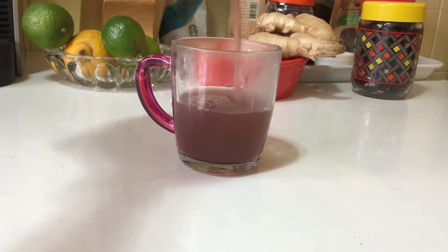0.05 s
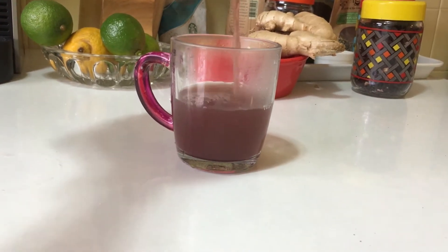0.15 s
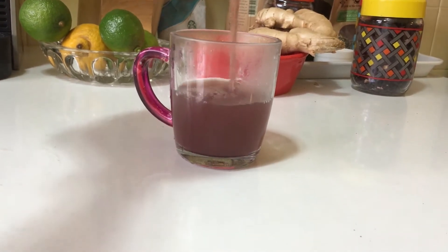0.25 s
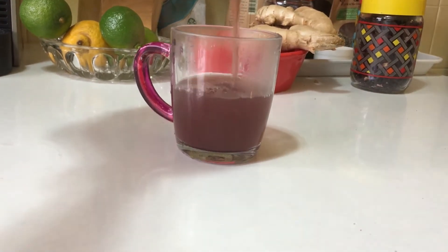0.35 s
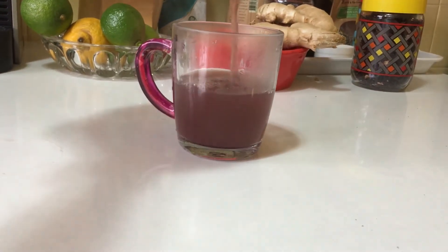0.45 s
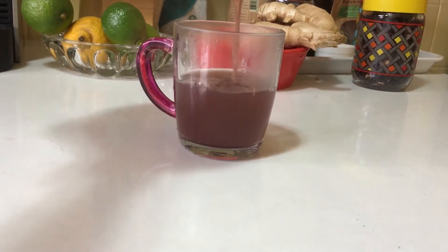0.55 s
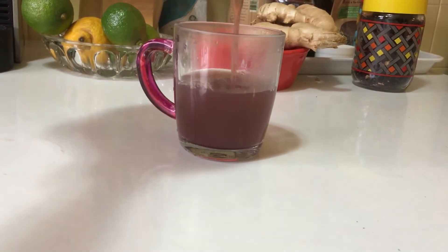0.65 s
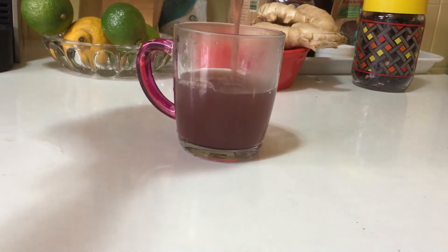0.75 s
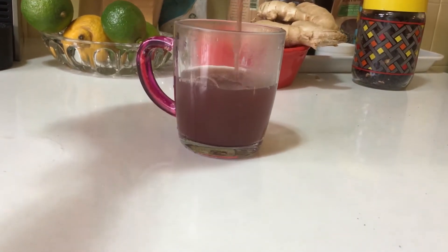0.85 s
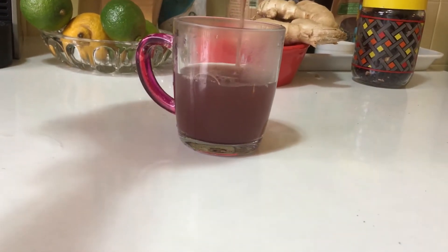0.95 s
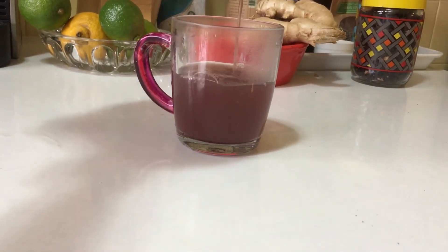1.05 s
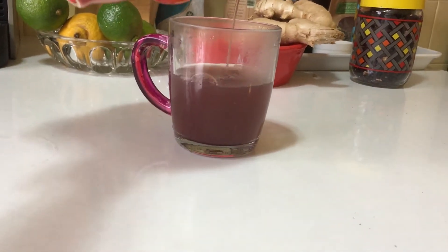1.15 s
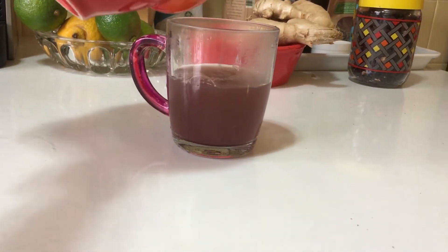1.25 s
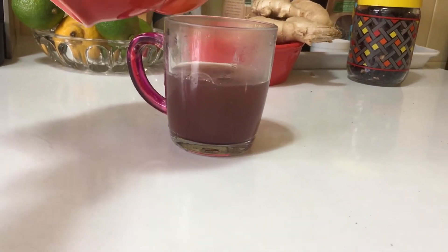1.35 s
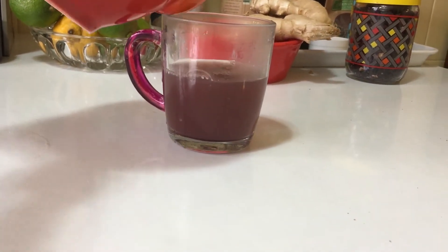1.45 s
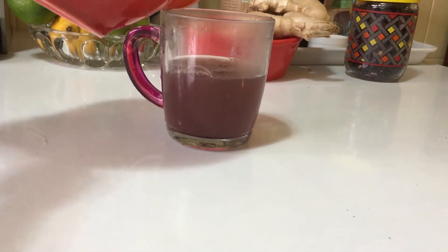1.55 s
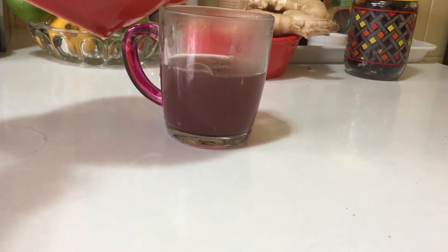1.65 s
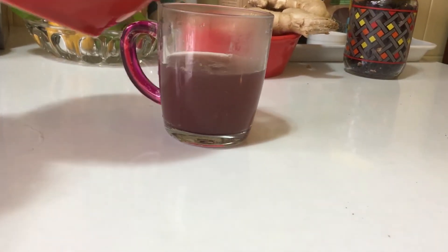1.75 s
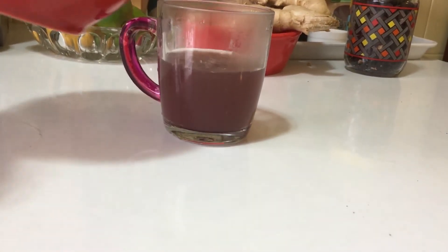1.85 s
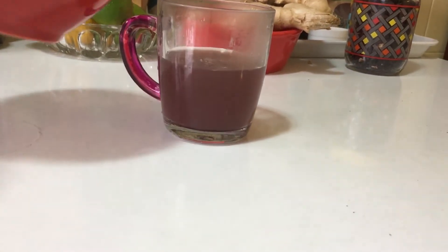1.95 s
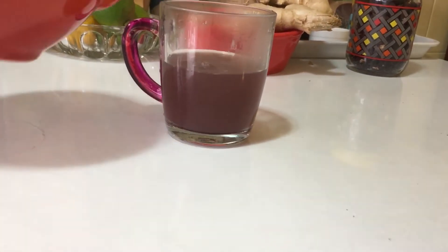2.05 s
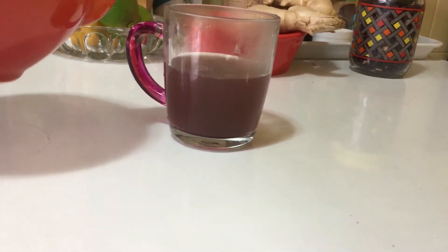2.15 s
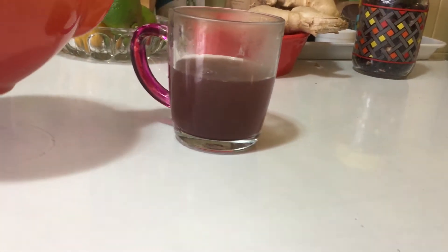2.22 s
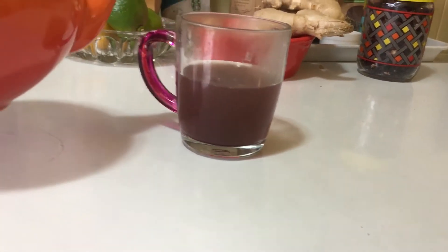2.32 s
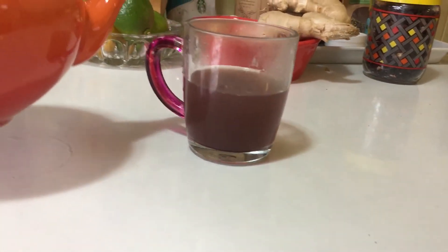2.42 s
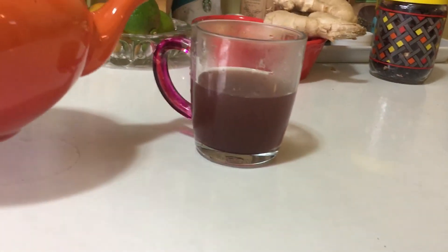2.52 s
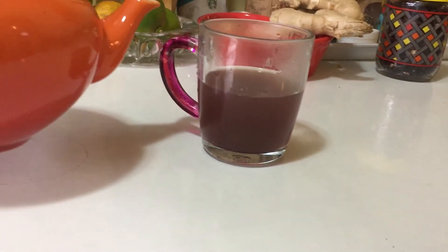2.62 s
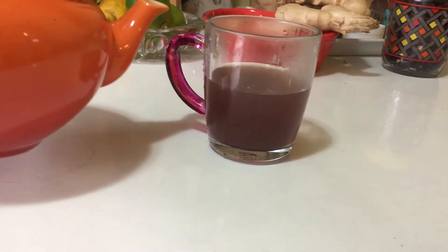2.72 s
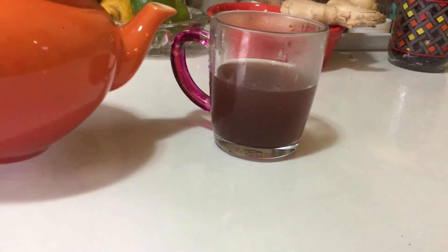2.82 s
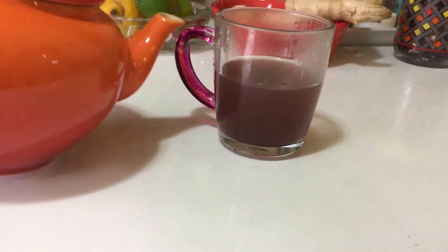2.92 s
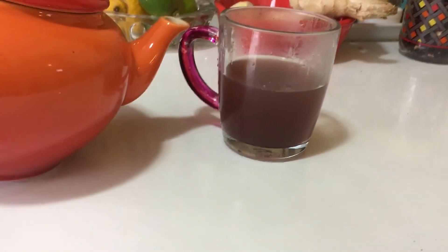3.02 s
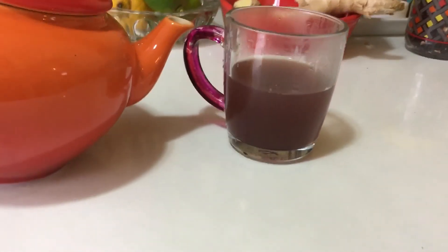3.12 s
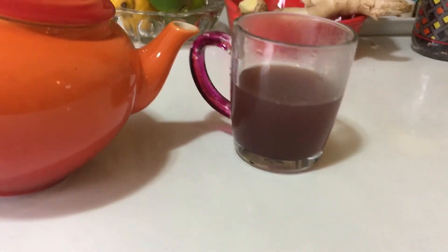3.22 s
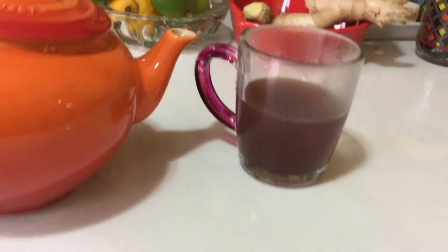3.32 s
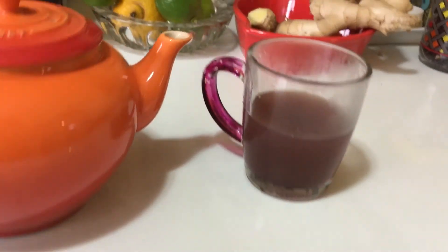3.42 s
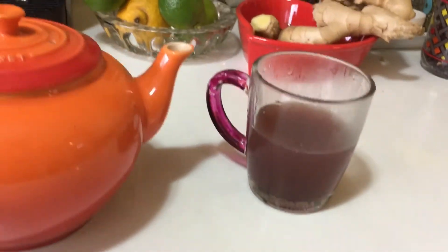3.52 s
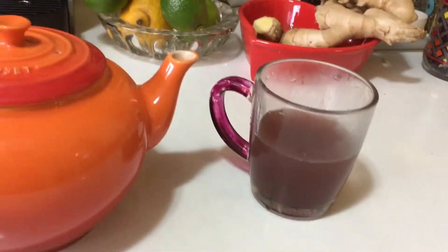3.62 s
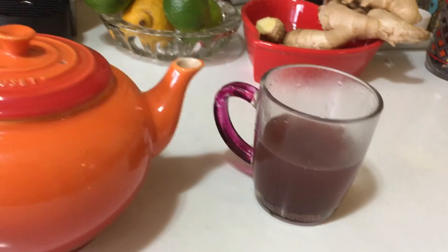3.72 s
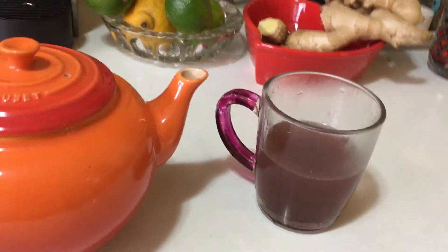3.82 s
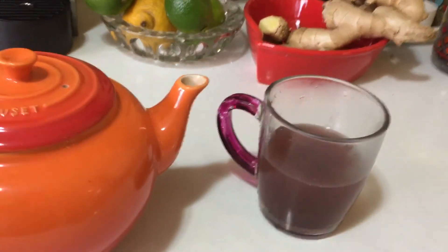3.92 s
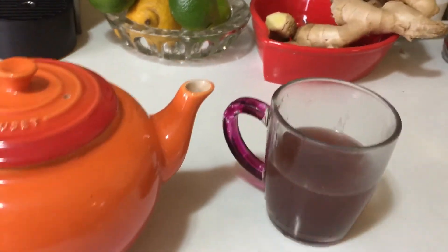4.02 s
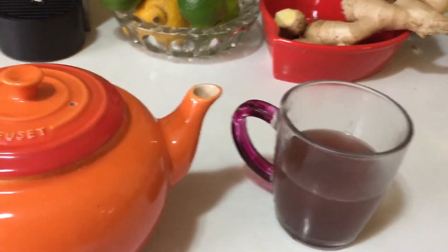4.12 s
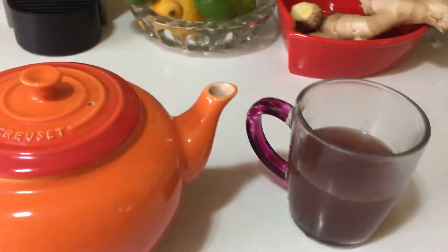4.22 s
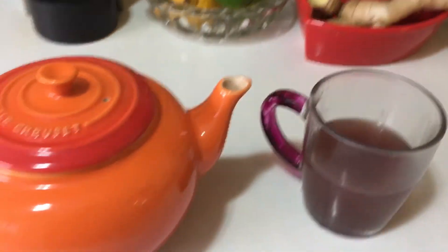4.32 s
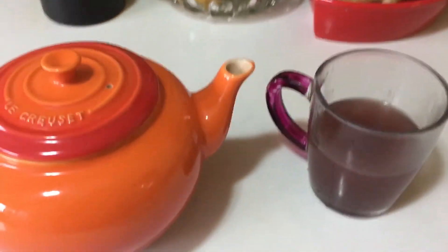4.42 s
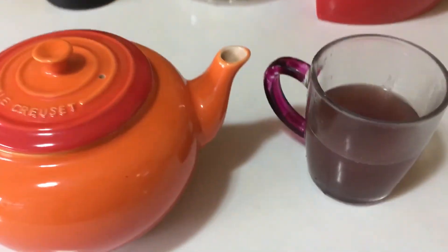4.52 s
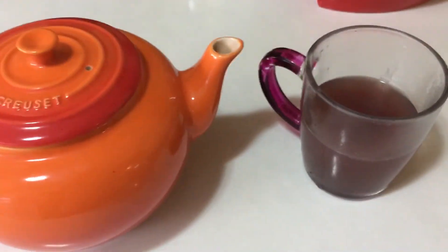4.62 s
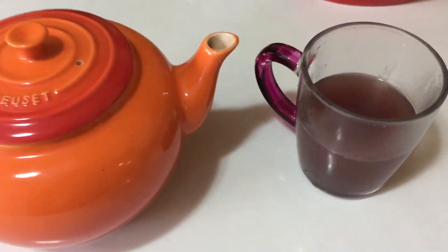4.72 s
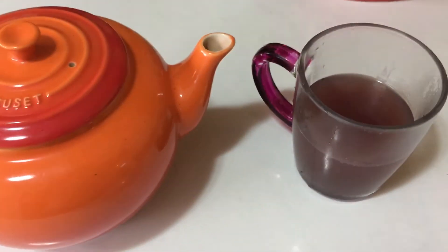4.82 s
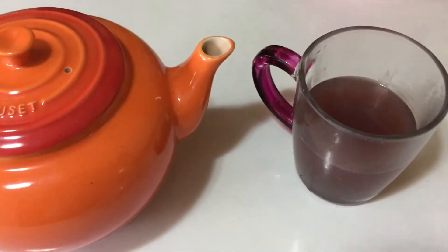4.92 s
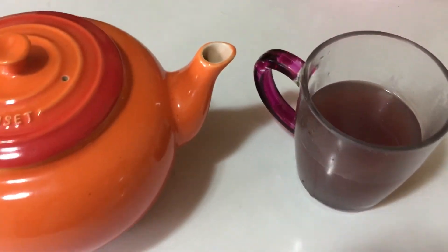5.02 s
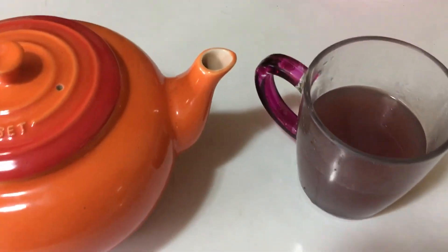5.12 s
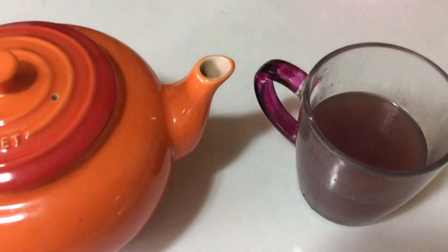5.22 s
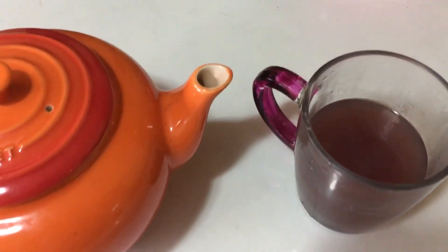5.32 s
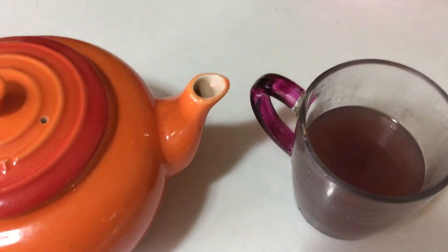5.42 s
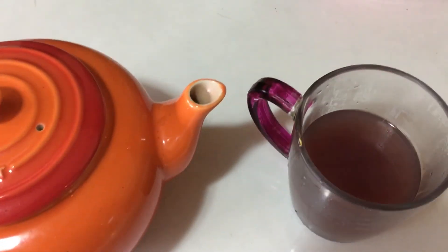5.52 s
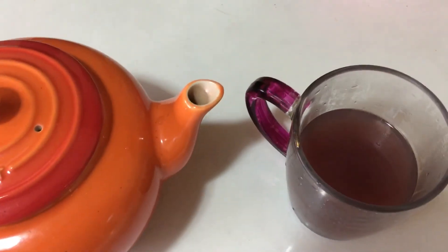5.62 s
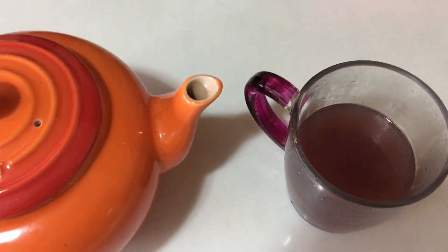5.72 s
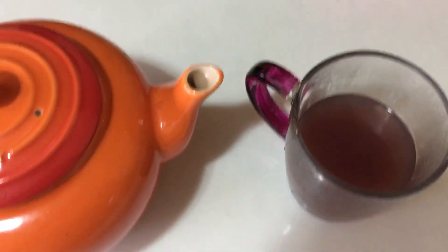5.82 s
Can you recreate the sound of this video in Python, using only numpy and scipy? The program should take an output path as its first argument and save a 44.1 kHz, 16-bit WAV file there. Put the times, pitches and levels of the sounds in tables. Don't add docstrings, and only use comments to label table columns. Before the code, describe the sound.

The last of a tea stream burbles and fizzes into a glass mug, a teapot clinks, then lands in two knocks with a lid rattle.

```python
import sys
import numpy as np
from scipy import signal
from scipy.fft import rfft, irfft
from scipy.io import wavfile
from scipy.ndimage import uniform_filter1d

SR = 44100
rng = np.random.default_rng(int(sys.argv[2]) if len(sys.argv) > 2 else 0)


def invert_db(x):
    u = np.asarray(x, float) / 20
    return 10 ** u


def wav_out(sig):
    wavfile.write(sys.argv[1], SR, np.round(np.clip(np.atleast_2d(sig).T, -1, 1) * 32767).astype(np.int16))


N = 258426
TIME = np.arange(N) / SR


def rms_one(x):
    return x / np.sqrt(np.mean(x ** 2) + 1e-20)


def at_hz(points, hz):
    table_hz, values = np.transpose(points)
    return np.interp(np.log(hz), np.log(table_hz), values)


def coloured(spectrum):
    hz = np.arange(N // 2 + 1) * SR / N + 1
    return rms_one(irfft(rfft(rng.standard_normal(N)) * invert_db(at_hz(spectrum, hz)), N))


def drift(rate_hz):
    steps = rng.standard_normal(2000)
    return np.interp(TIME * rate_hz * 2, np.arange(len(steps)), steps) * 1.22


def swells(rows):
    levels_db = [db - np.maximum(rise * (s - TIME), fall * (TIME - s)) for s, db, rise, fall in rows]
    return np.max(levels_db, axis=0)


def band(x, low_hz, high_hz):
    edges_hz = [low_hz, min(high_hz, 0.45 * SR)]
    return signal.sosfilt(signal.butter(2, edges_hz, "band", fs=SR, output="sos"), x)


def ring(clicks, hz, t60_s):
    r = invert_db(-60 / (t60_s * SR))
    w = 2 * np.pi * hz / SR
    return signal.lfilter([0, np.sin(w)], [1, -2 * r * np.cos(w), r * r], clicks + 1e-18)


def dying(t60_table, rise_s):
    t, out = TIME[:SR], 0
    white = rng.standard_normal((2, SR))
    for k, hz in enumerate(40 * 2 ** np.arange(0, 9, 0.5)):
        t60_s = at_hz(t60_table, hz * 1.19)
        out = out + band(white[k % 2], hz, hz * np.sqrt(2)) * invert_db(-60 * t / t60_s)
    out = out * (1 - np.exp(-t / rise_s))
    return out / np.sqrt(np.sum(out ** 2))


def add(out, sound, s):
    i = round(s * SR)
    out[i:i + len(sound)] += sound[:N - i]


def grains(per_s, spread_db):
    sizes = invert_db(spread_db * np.minimum(rng.exponential(1, N), 4)) * rng.choice([-1, 1], N)
    return sizes * (rng.random(N) < per_s / SR)


def struck(hits, pitches_hz, modes, spread_db, scuff_s):
    out = np.zeros(N)
    at = [round(s * SR) for s, db in hits]
    hit_db = np.array(hits)[:, 1]
    luck = rng.standard_normal((len(hits), len(modes)))
    soften = np.hanning(round(scuff_s * SR) + 3)
    for hz, (level_db, t60_s), own in zip(pitches_hz, modes, luck.T):
        clicks = np.zeros(N)
        clicks[at] = invert_db(hit_db + level_db + spread_db * own)
        contact = soften / soften.sum() * np.cos(2 * np.pi * hz * TIME[:len(soften)]) * 2
        out += ring(np.convolve(clicks, contact)[:N], hz, t60_s)
    return out


def ticks(table):
    out, t = np.zeros(N), TIME[:900]
    for (s, db, hz, snap_db), noise in zip(table, rng.standard_normal((len(table), 2, len(t)))):
        tone = 0.79 * np.sin(2 * np.pi * hz * t * (1 + 6 * t)) * np.exp(-t * hz / 11)
        spit = 0.66 * band(noise[0], hz / 1.77, hz * 1.76)
        snap = invert_db(snap_db) * band(noise[1], 5100, 16500)
        decay = np.exp(-t / 0.0006) + 0.32 * np.exp(-t / 0.0095)
        add(out, invert_db(db - 3.5) * (tone + (spit + snap) * decay), s)
    return out


# (frequency [Hz], density [dB per Hz])
AIR_SPECTRUM = [(47, -44), (80, -1), (145, -2.5), (230, -6), (274, 2), (313, -11), (381, -6), (485, -9),
                (518, -18.5), (618, -11), (770, -16), (1250, -14), (1900, -20), (4990, -34.5), (15300, -51)]
# (peak time [s], level [dB], rise [dB/s], fall [dB/s])
RUMBLE_SWELLS = [(.36, -46, 2, 15), (1.32, -45.5, 22, 60), (1.78, -45.5, 61, 32), (3.18, -34, 77, 95),
                 (4.8, -46, 4, 8), (5.4, -44, 12, 10)]


def room_tone():
    air = invert_db(-53 + 0.5 * drift(5.1)) * coloured(AIR_SPECTRUM)
    rumble = rms_one(band(band(rng.standard_normal(N), 45.6, 59.5), 24.6, 79))
    evened = rumble / np.sqrt(uniform_filter1d(rumble ** 2, size=5000) + 0.055)
    floor_db, wander_db = -50.5, 2.5
    rumble_db = np.maximum(swells(RUMBLE_SWELLS), floor_db) + wander_db * drift(3.1)
    return air + invert_db(rumble_db) * evened


# (frequency [Hz], t60 [s])
KITCHEN_T60 = [(60, 0.49), (250, 0.36), (1000, 0.35), (4000, 0.44), (16000, 0.1)]


def kitchen(sent):
    return signal.fftconvolve(sent, dying(KITCHEN_T60, rise_s=0.0047))[:N]


# (peak time [s], level [dB], rise [dB/s], fall [dB/s])
RUSTLE_SWELLS = [
    (3.05, -61.5, 1500, 88),
    (3.43, -67.5, 31, 300),
    (3.56, -58, 887, 300),
    (3.62, -71.5, 200, 52),
    (3.84, -52.5, 700, 74),
    (4.12, -71.5, 90, 29),
]
# (start [s], end [s], first pitch [Hz], last pitch [Hz], level [dB])
RUBS = [
    (2.041, 2.191, 4400, 3960, -71),
    (2.78, 3.024, 2880, 2920, -71),
    (3.045, 3.413, 2930, 2890, -69),
]
# (start [s], end [s], level [dB], early peak [0-1])
BRUSHES = [
    (4.29, 4.378, -62.5, 0.6),
    (3.044, 3.9, -64, 0.02),
    (3.536, 3.63, -52, 0.3),
    (3.818, 3.89, -56, .3),
]
# (time [s], peak [dB], pitch [Hz], snap [dB])
FINGER_TICKS = [
    (4.4285, -62, 4350, 2),
    (4.6344, -59, 4200, 11),
    (4.72, -67, 9500, 9),
]


def handling():
    out = invert_db(swells(RUSTLE_SWELLS) + drift(25)) * rms_one(band(rng.standard_normal(N), 1890, 13160))
    for start, end, first_hz, last_hz, db in RUBS:
        part = np.clip((TIME - start) / (end - start), 0, 1)
        hz = first_hz + (last_hz - first_hz) * part + first_hz * 0.0029 * drift(51)
        level = invert_db(db + 1.3 * drift(46)) * (1.2 + 0.5 * drift(77))
        out += level * np.sin(np.pi * part) ** 0.25 * np.sin(2 * np.pi * np.cumsum(hz) / SR)
    for start, end, db, early in BRUSHES:
        part = np.clip((TIME - start) / (end - start), 0, 1)
        noise = rms_one(band(rng.standard_normal(N), 7500, 17930))
        out += invert_db(db) * np.sin(np.pi * part ** early) ** 2 * noise
    return out + ticks(FINGER_TICKS)


# (time [s], level [dB])
KNUCKLE_HITS = [
    (3.8195, -19.5),
]
# (level [dB], t60 [s])
KNUCKLE_HZ = [1675, 3300, 5980, 7940, 12020]
KNUCKLE_MODES = [(4.5, 0.0034), (-2, 0.004), (-10, 0.0061), (-15, 0.0042), (-31, .004)]


def knuckle():
    return struck(KNUCKLE_HITS, KNUCKLE_HZ, KNUCKLE_MODES, spread_db=3.0, scuff_s=0.0002)


# (time [s], level [dB])
POT_HITS = [
    (1.546, -26.5),
]
# (level [dB], t60 [s])
POT_PITCHES_HZ = [506, 581, 786, 1985, 2202, 2051, 4134, 4240, 4759, 4790, 5782, 5850, 6600, 7795, 10100,
                  12500, 14800]
POT_MODES = [(-1.5, 0.057), (4, 0.11), (-16, 0.04), (-5.5, 0.53), (-2.5, 0.59), (3, 0.042), (-16, 0.11),
             (-16, 0.08), (-8.5, 0.1), (-44, 0.21), (-20, 0.12), (-16.5, 0.04), (-25, 0.058), (-26, 0.079),
             (-22, 0.018), (-22, 0.013), (-24, .015)]
# (time [s], level [dB])
RIM_HITS = [
    (2.039, -58),
]
# (level [dB], t60 [s])
RIM_HZ = [3400, 4400, 6100, 6600, 11000]
RIM_MODES = [(-6, 0.065), (-18, .08), (-4, .02), (-1, 0.057), (-3, .02)]


def clink():
    pot = struck(POT_HITS, POT_PITCHES_HZ, POT_MODES, spread_db=0.5, scuff_s=0.00057)
    return pot + struck(RIM_HITS, RIM_HZ, RIM_MODES, spread_db=0.5, scuff_s=0.001)


# (time [s], level [dB])
LID_JUMPS = [
    (3.539, -30),
    (3.545, -25),
    (3.557, -24),
    (3.564, -24.5),
]
# (level [dB], t60 [s])
SEATED_HZ = [3900, 4300, 5281, 6137, 6385, 6542, 7015, 7640, 7765, 7814, 8690, 8963, 9318, 9625, 10150,
             10280, 11220, 11370, 12120, 13260, 15060, 15480]
SEATED_MODES = [(-3.5, 0.03), (-21, 0.19), (-26, 0.071), (-8.5, 0.042), (-16, 0.11), (-12, 0.073),
                (-12.5, 0.071), (-18.5, 0.083), (-3, 0.04), (-11.5, 0.08), (-18, .07), (-15, 0.07),
                (-16.5, 0.0594), (-16.5, .06), (-13, 0.045), (-18, 0.045), (-15.5, 0.039), (-26, .04),
                (-23, 0.027), (-33, 0.0407), (-31, .04), (-30, 0.0567)]
# (time [s], level [dB])
LID_ROCKS = [
    (3.849, -48),
    (3.91, -55),
    (3.92, -52),
    (3.94, -52.5),
    (3.969, -56),
    (3.976, -48),
    (3.99, -51.5),
    (4.047, -66),
]
# (level [dB], t60 [s])
TILTED_PITCHES_HZ = [4118, 4334, 5900, 6094, 7090, 7600, 8533, 9437, 9625, 11230, 11370, 11580, 13050,
                     13340, 14610, 15400]
TILTED_MODES = [(3, 0.031), (-11, 0.15), (-3, 0.037), (-1, 0.098), (-8.5, 0.064), (-18, .08), (-21, 0.12),
                (0, 0.047), (-9, .1), (-24, 0.092), (-6, 0.059), (-12, 0.064), (-14, .05), (-16, .08),
                (-17, .07), (-18, 0.077)]


def lid():
    touches, gap_s, first_db, loss_db = 9, 0.0066, -34, 4
    run_s = LID_JUMPS[-1][0] + gap_s * np.cumsum(0.5 + rng.random(touches))
    chatter = [(s, first_db - loss_db * k) for k, s in enumerate(run_s)]
    seated = struck(LID_JUMPS + chatter, SEATED_HZ, SEATED_MODES, spread_db=3.0, scuff_s=0.001)
    return seated + struck(LID_ROCKS, TILTED_PITCHES_HZ, TILTED_MODES, spread_db=5.5, scuff_s=0.002)


# (time [s], level [dB], contact up to [Hz], heft [dB], edge [dB])
COUNTER_BLOWS = [
    (1.5451, -16, 1810, -14.5, -41),
    (3.0442, -9.5, 1900, -5, -6.5),
    (3.1383, -22, 1590, -2.5, -10),
    (3.5321, -7, 2090, -8, -4.5),
    (3.546, -21.5, 890, -4, -28),
    (3.848, -24.5, 960, -21, 3),
    (4.338, -44, 3960, -29, 1),
]
# (pitch [Hz], level [dB], t60 [s])
COUNTER_MODES = [(60.3, -5.5, 0.17), (109.7, 1.5, 0.28), (120.1, -9, 0.44), (137.5, -7.5, 0.34),
                 (210.4, 3, 0.092), (267.6, -9.5, 0.39), (295, 11, 0.038), (377, -18, 0.14),
                 (536, 5, 0.028), (600, 1.5, 0.025), (826, -16, .05)]
# (frequency [Hz], t60 [s])
COUNTER_T60 = [(60, 0.14), (250, 0.24), (1000, 0.093), (4000, 0.067), (16000, 0.034)]


def knocks():
    out, t = np.zeros(N), TIME[:SR]
    click = t == 0
    heavy_hz, heft_db_per_octave = 175, 11.5
    for s, db, high_hz, heft_db, edge_db in COUNTER_BLOWS:
        low_hz = min(heavy_hz * 2 ** (-heft_db / heft_db_per_octave), 0.7 * high_hz)
        rounded = signal.sosfilt(signal.butter(4, high_hz * 1.18, fs=SR, output="sos"), click)
        edge = invert_db(edge_db) * band(band(click, 1400, 4600), 1200, 9500)
        push = band(rounded, low_hz, high_hz) * np.sqrt(SR / high_hz) + edge
        top = 2.7 * push + 4.55 * signal.fftconvolve(push, dying(COUNTER_T60, rise_s=0.0005))[:SR]
        bass = np.zeros(SR)
        for hz, mode_db, t60_s in COUNTER_MODES:
            build_up = 1 - np.exp(-t * hz / 0.44)
            bass += invert_db(mode_db) * ring(click, hz, t60_s) * build_up
        add(out, invert_db(db) * (invert_db(heft_db) * bass - top), s)
    return out


# (peak time [s], level [dB], rise [dB/s], fall [dB/s])
FOAM_SWELLS = [
    (1.75, -74, 8, 28.5),
]


def foam():
    pops = grains(900 * invert_db(4 * drift(25)), spread_db=6.0)
    rings = ring(pops, 8500, 0.0025) + ring(np.roll(pops, SR), 9100, 0.0047)
    return invert_db(swells(FOAM_SWELLS)) * rms_one(rings)


# (time [s], peak [dB], pitch [Hz], snap [dB])
LOUD_DROPS = [(0.0834, -39, 8500, -24), (0.1156, -47, 5500, -18), (0.1375, -36, 12400, -6),
              (0.186, -41.5, 9500, -18), (0.223, -44, 9340, -6), (0.265, -34.5, 6070, -5),
              (0.314, -53, 6100, 4), (0.3458, -36, 9800, -12), (0.399, -45.5, 8420, -16),
              (0.4474, -46, 9200, 0), (0.5053, -39, 11300, -25), (0.5525, -37.5, 12500, -18),
              (0.6, -38, 15200, -23), (0.62, -37, 7030, -8), (0.6484, -45, 13100, -12),
              (0.7126, -37, 9300, -21), (0.7536, -42.5, 5940, 4.5), (0.83, -49, 5810, -8),
              (1.2003, -48, 8300, -17), (0.9676, -45, 6100, -28), (1.0046, -44.5, 4340, -1),
              (1.0867, -50, 4600, -9), (1.1027, -45.5, 11000, 1.5), (1.3025, -42, 6900, -23),
              (1.3457, -41, 5960, -3), (1.3648, -38.5, 5340, -9)]
# (time [s], peak [dB], pitch [Hz])
LARGE_DROPS = [(0.0824, -47, 3300), (0.2638, -46, 3600), (0.398, -48, 3300), (0.4472, -47, 3080),
               (0.5511, -50, 3330), (0.77, -48, 4400), (0.831, -45.5, 3710), (0.9164, -48, 3850),
               (1.0053, -57, 3150), (1.0872, -44, 3180), (1.437, -47, 4300)]


def drops():
    count, until_s, mean_db, spread_db = 22, 1.5, -54.5, 2.5
    small = []
    for k, (when, size, pitch) in enumerate(rng.random((count, 3))):
        s = until_s * (k + when) / count
        small.append((s, mean_db + spread_db * (2 * size - 1), 4300 * 2.9 ** pitch, -29))
    large = [(s, db, hz, -9) for s, db, hz in LARGE_DROPS]
    return ticks(LOUD_DROPS + small + large)


# (time [s], level [dB], first pitch [Hz], last pitch [Hz], length [s])
AIR_GULPS = [
    (.002, -35, 1160, 1370, 0.014),
    (.452, -41, 420, 480, 0.026),
    (0.943, -39, 223, 154, 0.072),
]


def gulps():
    out = np.zeros(N)
    for s, db, first_hz, last_hz, length_s in AIR_GULPS:
        part = TIME[:round(length_s * SR)] / length_s
        turns = np.cumsum(first_hz + (last_hz - first_hz) * np.sqrt(part)) / SR
        add(out, invert_db(db) * np.sin(np.pi * part ** 0.18) * np.sin(2 * np.pi * turns), s)
    return out


# (time [s], peak [dB], pitch [Hz])
AIR_POCKETS = [(0.083, -38.5, 1570), (0.151, -43, 1280), (0.185, -36, 1120), (0.222, -43, 1150),
               (0.265, -45, 1070), (0.314, -38.5, 1220), (0.346, -35.5, 1270), (0.401, -35, 1070),
               (0.427, -32, 964), (0.448, -38, 1240), (0.506, -42, 1130), (0.533, -41, 1320),
               (0.552, -40, 1430), (0.601, -37.5, 1060), (0.649, -38, 1270), (0.727, -43, 1250),
               (0.753, -42, 1020), (0.83, -41, 1150), (0.899, -43.5, 1410), (0.98, -45, 1290),
               (1.088, -30.5, 1300), (1.365, -37, 1100)]


def plops():
    out, t = np.zeros(N), TIME[:2600]
    for (s, db, hz), noise in zip(AIR_POCKETS, rng.standard_normal((len(AIR_POCKETS), len(t)))):
        turns = t * hz
        pocket = invert_db(9.5) * turns * np.exp(-turns / 0.96) * np.sin(2 * np.pi * turns)
        slosh_shape = (1 - np.exp(-t / 0.00098)) * np.exp(-t / 0.013)
        slosh = invert_db(-8.0) * rms_one(band(noise, hz / 1.18, hz * 1.23)) * slosh_shape
        add(out, invert_db(db) * (pocket + slosh), s)
    return out


# (time [s], level [dB])
STREAM_FLOW = [
    (0.0, 8),
    (0.26, -1),
    (0.75, 1.3),
    (1.23, 0.5),
    (1.38, -6),
    (1.59, -0.5),
    (1.92, -12),
    (2.5, -14),
]


def flow():
    s, db = np.transpose(STREAM_FLOW)
    flow_db = np.interp(TIME, s, db)
    rest_db = 178 * np.maximum(TIME - 2.5, 0)
    bubble_db = -58.5 + 0.12 * flow_db - rest_db
    spray_db = -63 + flow_db - rest_db
    return bubble_db, spray_db


def burble():
    born = grains(400 * invert_db(10.0 * drift(9)), spread_db=4.5)
    dealt = rng.integers(0, 14, N)
    pitches_hz = np.geomspace(850, 2000, 14)
    rings = sum(ring(born * (dealt == k), hz, 8.3 / hz) for k, hz in enumerate(pitches_hz))
    bubble_db, _ = flow()
    return invert_db(bubble_db - 12.5) * rms_one(band(rings, 850, 1850))


# (pitch [Hz], width [Hz], level [dB])
MUG_RESONANCES = [(445, 250, 9), (1020, 146, 4), (1292, 50, -0.5), (1900, 630, -12), (2960, 1100, -12)]
# (frequency [Hz], density [dB per Hz])
SPRAY_SPECTRUM = [(1180, 13), (2000, 14), (2610, -1), (3220, 3.5), (5010, -13), (6250, 0.5), (9460, -8),
                  (10300, -3.5), (15100, -14), (16500, -3)]


def stream():
    bubble_db, spray_db = flow()
    impacts = grains(2500 * invert_db(3.3 * drift(25)), spread_db=5.0)
    hollow = sum(invert_db(db) * rms_one(band(impacts, hz - width / 2, hz + width / 2))
                 for hz, width, db in MUG_RESONANCES)
    droplets = grains(5000 * invert_db(4.8 * drift(23)), spread_db=8.5)
    dealt = rng.integers(0, 16, N)
    fizz = np.zeros(N)
    for k, hz in enumerate(np.geomspace(2300, 15500, 16)):
        fizz += invert_db(at_hz(SPRAY_SPECTRUM, hz)) * hz * ring(droplets * (dealt == k), hz, 16.0 / hz)
    spray = rms_one(band(fizz, 1900, 17600)) + 1.9 * coloured(SPRAY_SPECTRUM)
    return invert_db(bubble_db) * rms_one(hollow) + invert_db(spray_db + 2.2 * drift(6.8)) * rms_one(spray)


def scene():
    water = stream() + burble() + plops() + gulps() + drops() + foam()
    hard = knocks() + handling()
    pot, pot_lid, snap = clink(), lid(), knuckle()
    sent = invert_db(-7.5) * water + invert_db(-9.5) * hard + invert_db(-15.5) * pot + invert_db(-13.5) * pot_lid + invert_db(-1.0) * snap
    return (water + hard + pot + pot_lid + snap + kitchen(sent) + room_tone())[None]


def low_pass(x):
    return signal.sosfilt(signal.butter(12, 16860, fs=SR, output="sos"), x)


def record(dry):
    notch_hz, width_hz, share = 10530, 1950, 0.36
    heard = dry - share * band(dry, notch_hz - width_hz / 2, notch_hz + width_hz / 2)
    mix = signal.sosfilt(signal.cheby1(10, 1, 15850, fs=SR, output="sos"), heard)
    return low_pass(mix)


dry = scene()
out = record(dry)
wav_out(out)
```